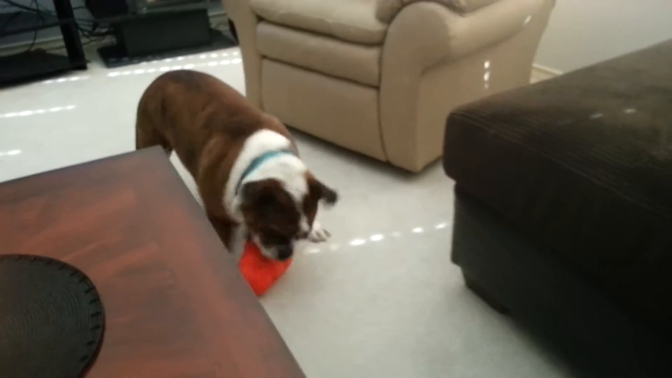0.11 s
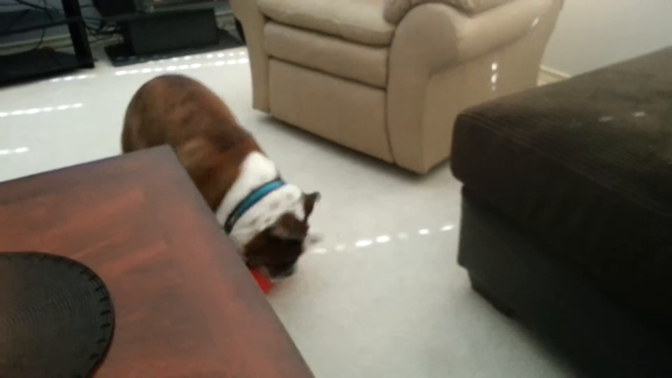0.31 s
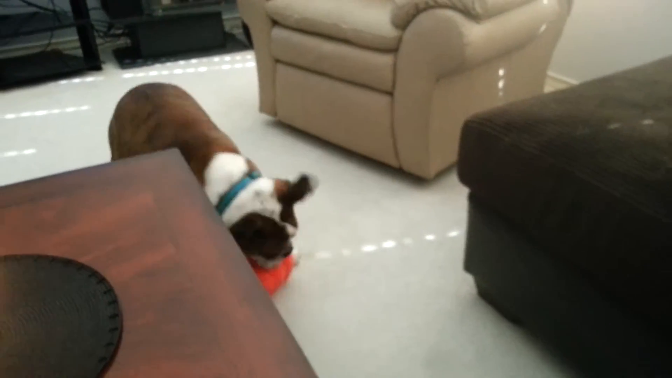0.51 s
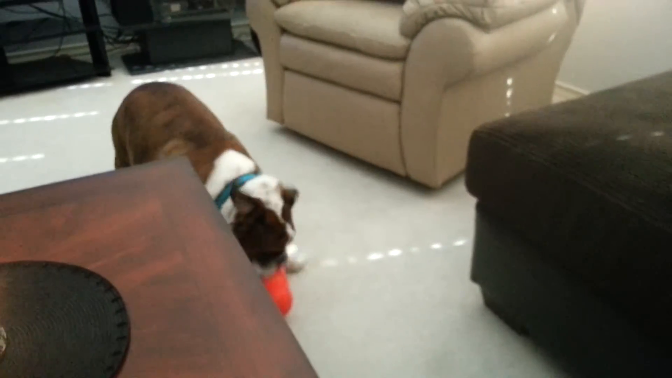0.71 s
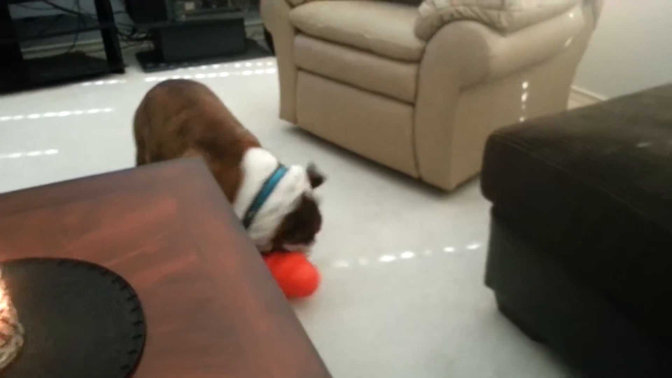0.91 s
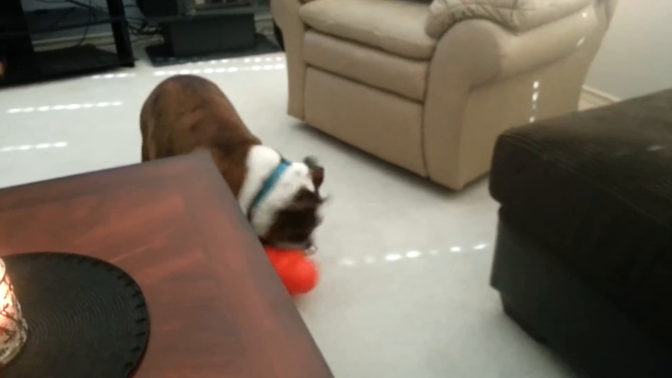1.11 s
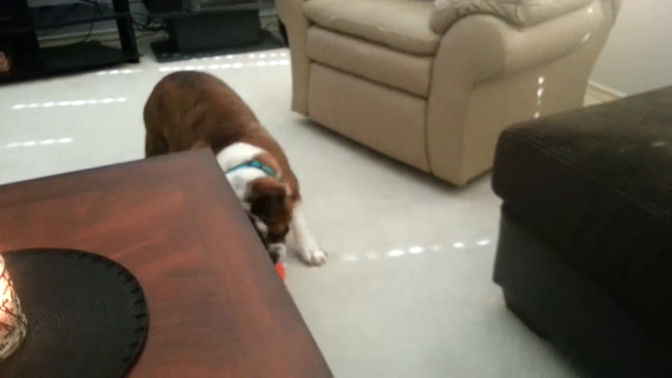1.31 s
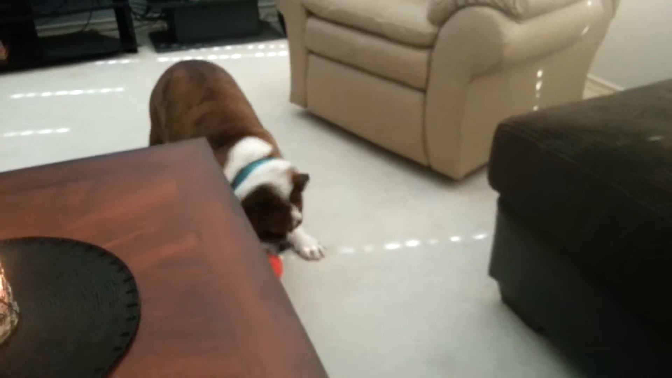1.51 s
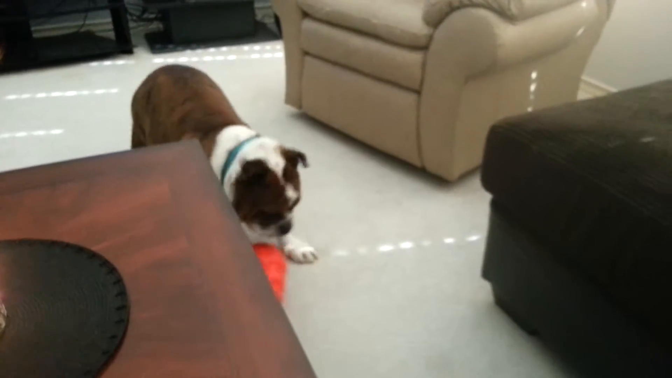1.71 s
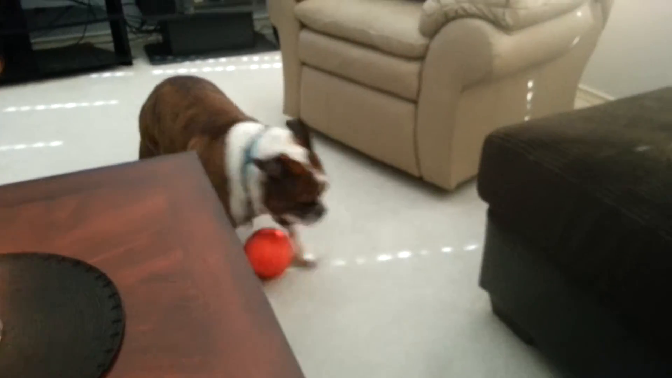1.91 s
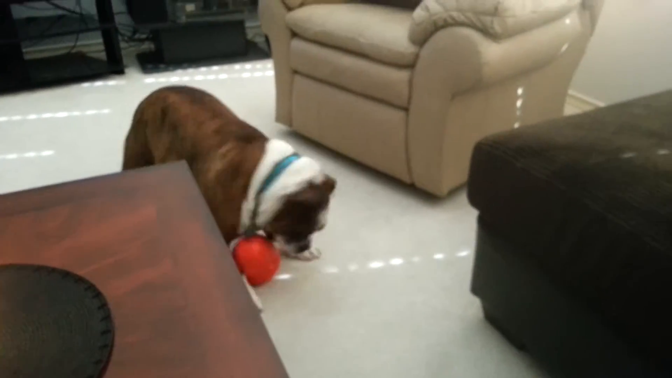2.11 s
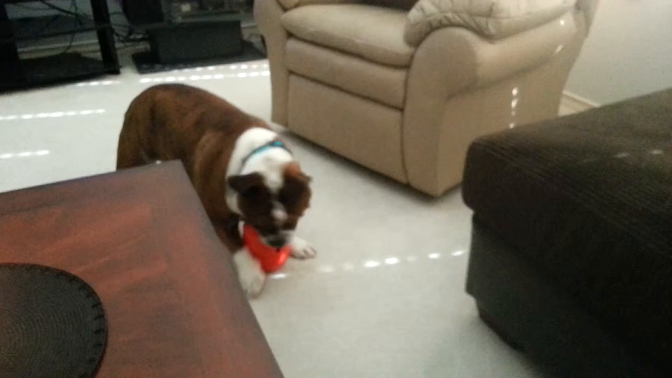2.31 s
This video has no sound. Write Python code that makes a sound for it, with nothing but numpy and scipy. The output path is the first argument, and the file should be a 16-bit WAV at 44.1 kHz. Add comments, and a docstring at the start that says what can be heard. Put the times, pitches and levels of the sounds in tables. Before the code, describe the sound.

Dog's raspy snorts and grunts, with ball knocks, mouth clicks and jingling collar tags indoors

```python
"""A short-nosed dog snorts three times while it noses and mouths a rubber ball on a living-room floor.
Snorts: uneven palate slaps chop noise, throat filters colour it, and a wavering tone grunts along.
Snuffles are filtered noise puffs; clicks and bumps are filtered snaps; scuffs are dense filtered ticks.
Collar tags and their ring are damped modes struck by snaps. A room with short reverb and a steady
room tone surrounds all this."""
import sys
import numpy as np
from scipy import signal
from scipy.fft import rfft, irfft
from scipy.io import wavfile
from scipy.ndimage import uniform_filter1d

SR = 44100
rng = np.random.default_rng(int(sys.argv[2]) if len(sys.argv) > 2 else 0)


def persist_wave(psi):
    """Save psi, clipped to +-1, as 16-bit WAV."""
    counts = np.round(np.clip(psi, -1, 1) * 32767).astype(np.int16)
    wavfile.write(sys.argv[1], SR, np.atleast_2d(counts).T)


N = 105840

# Snorts: start t/s, attack/s, hold/s, release/s, level/dB, median palate flutter f/Hz,
# slap level/dB, grunt f/Hz, grunt level re snort/dB
SNORTS = [(0.222, 0.091, 0.027, 0.078, -22.5, 98, -4.5, 641.7, -4),
          (1.005, 0.025, 0.12, 0.039, -31.5, 90.23, -12.5, 632.4, -4),
          (1.629, 0.08, 0.038, 0.15, -27.5, 82.04, -7, 700, -10)]
GRAINS_PER_S = 1800  # scuffs and tag shiver


def undb(db):
    """Level in dB to amplitude ratio."""
    return 10 ** (np.asarray(db) / 20)


def unit(x):
    """Scale to unit RMS."""
    return x / np.sqrt(np.mean(x ** 2) + 1e-18)


def times():
    """Sample times in s."""
    return np.arange(N) / SR


def freqs():
    """Bin frequencies in Hz of the zero-padded spectrum, at least 1."""
    return np.maximum(np.fft.rfftfreq(2 * N, 1 / SR), 1)


def curve(points):
    """(Hz, dB) points joined on a log-frequency axis."""
    hz, db = np.array(points).T
    return np.interp(np.log(freqs()), np.log(hz), db)


def hump(hz, octaves):
    """Broad resonance in dB: 4 dB down at the given octaves either side, floor at -70 dB."""
    return np.maximum(-4 * (np.log2(freqs() / hz) / octaves) ** 2, -70)


def resonances(modes):
    """Summed power response in dB of damped modes (Hz, width Hz, dB)."""
    power = 0
    for hz, width_hz, db in modes:
        detune = (freqs() / hz - hz / freqs()) * hz / width_hz
        power = power + undb(db) ** 2 / (1 + detune ** 2)
    return 10 * np.log10(power)


def colour(x, db):
    """Minimum-phase filter of unit power gain with the given dB response."""
    cepstrum = irfft(np.log(unit(undb(db))))
    cepstrum[1:N] *= 2  # fold to make it causal
    cepstrum[N + 1:] = 0
    response = np.exp(rfft(cepstrum))
    return irfft(rfft(x, 2 * N) * response)[:N]


def fade(t60_s, start_s=0):
    """Exponential decay, 60 dB per t60_s, from a start time."""
    t = times() - start_s
    return (t >= 0) * np.exp(-np.log(1000) * np.clip(t / t60_s, 0, 10))


def swell(start_s, attack_s, hold_s, release_s):
    """Attack, hold, release, with slightly concave ramps."""
    corners_s = start_s + np.cumsum([0, attack_s, hold_s, release_s])
    return np.interp(times(), corners_s, [0, 1, 1, 0]) ** 1.11


def burst(start_s, length_s, attack, hold):
    """Swell whose attack and hold are shares of its length."""
    release = max(1 - attack - hold, 0)
    return swell(start_s, length_s * attack, length_s * hold, length_s * release)


def noise():
    """White noise of unit RMS."""
    return rng.standard_normal(N)


def grains(per_s):
    """Tiny ticks at random moments and of random size, unit RMS."""
    return unit((rng.random(N) < per_s / SR) * noise())


def snap(start_s, t60_s, rattle):
    """Blow of unit energy: one impulse and a dying noise chatter."""
    impulse = 1. * (np.arange(N) == int(start_s * SR))
    return unit(impulse + rattle * noise() * fade(t60_s, start_s)) / np.sqrt(N)


def diffuse():
    """Stereo noise, alike in the bass and unrelated in the treble."""
    spread_hz = 560
    alike = 1 / (1 + (freqs() / spread_hz) ** 2)
    mid = irfft(rfft(noise(), 2 * N) * np.sqrt((1 + alike) / 2))[:N]
    side = irfft(rfft(noise(), 2 * N) * np.sqrt((1 - alike) / 2))[:N]
    return np.array([mid + side, mid - side])


def snuffles():
    """Quiet turbulent air through the nose, each puff with its own nostril resonance."""
    # start t/s, length/s, level/dB, nostril f/Hz
    puffs = [(-.04, 0.17, -42, 827), (0.046, 0.1, -44.5, 1320), (0.203, 0.13, -31, 1294),
             (0.491, 0.25, -40.5, 2255), (0.698, 0.16, -42, 2065), (0.999, 0.033, -42, 1800),
             (1.271, 0.089, -43, 923), (2.122, 0.35, -48, 2340)]
    # nose spectrum: f/Hz, level/dB per Hz
    nose = [(100, -9.5), (227, 0.5), (449, -8), (962, 1.5), (2200, -3.5), (4870, -8.5), (12000, -26)]
    nostril_db, nostril_octaves = -5.5, 0.094
    air = colour(noise(), curve(nose))
    out = 0
    for start_s, length_s, db, hz in puffs:
        whistle = undb(nostril_db) * colour(noise(), hump(hz, nostril_octaves))
        puff = burst(start_s, length_s, attack=0.27, hold=0.18)
        out = out + undb(db) * puff * (air + whistle)
    return out


def room_tone():
    """Steady diffuse noise with the room's spectrum."""
    # room tone spectrum: f/Hz, level/dB per Hz
    air = [(30, -14), (70, -7), (120, -12), (240, -1.5), (450, -10), (900, -8), (1600, -17), (4900, -19),
           (6000, -22.5), (14000, -29)]
    return undb(-49.5) * np.array([colour(channel, curve(air)) for channel in diffuse()])


def tags():
    """A tick and a chatter ring two tags and their ring; large tag and ring also shiver throughout."""
    # clinks: t/s, large tag level/dB, small tag level/dB, ring level/dB
    clinks = [(.112, -7, -5.5, -14), (.426, -3.5, -22, -9.5), (0.593, -14, -15, -13), (.912, -11, -19, -14),
              (.938, -7, -32, -14.5), (1.168, -12, -30, -9), (1.36, -10.5, -3.5, -4.5),
              (1.3735, -10, -11, -17), (1.385, -16, -20, -4.5), (2.031, 3.5, -24, -13.5),
              (2.086, -5, -43, -18), (2.21, -8.5, -28, -27), (2.275, -7.5, -50, -23)]
    # modes of large tag, small tag, ring: f/Hz, width/Hz, level/dB
    metal = [
        [(4710, 110, 0), (4930, 280, -4), (7700, 400, -13)],
        [(6450, 50, 0), (6130, 50, -9), (7300, 1800, -21)],
        [(11750, 70, 0)],
    ]
    chatter_t60_s, chatter, shiver_db = 0.073, 0.098, -56.5
    blows = np.array([snap(row[0], chatter_t60_s, chatter) for row in clinks])
    large, _, ring = metal
    out = undb(shiver_db) * colour(grains(GRAINS_PER_S), resonances(large + ring))
    for levels_db, modes in zip(np.array(clinks).T[1:], metal):
        out = out + colour(undb(levels_db) @ blows, resonances(modes))
    return out


def bumps():
    """Dull blows of paws and ball on the floor; the hollow ball adds a faint knock to each."""
    # t/s, level/dB, centre f/Hz
    blows = [(.006, -18.5, 101), (.232, -7, 200), (.456, -4.5, 253), (0.55, -8.5, 160), (.755, -15.5, 180),
             (.793, -9.5, 162), (0.922, -18, 131), (1.175, -8, 298), (1.397, -10.5, 310),
             (1.397, -13.5, 84), (2.02, -9, 201), (2.061, -12, 95), (2.275, -11.5, 290)]
    octaves, knock_hz, knock_db = .8, 594, -15.5
    knock = knock_db + hump(knock_hz, octaves)
    out = 0
    for start_s, db, hz in blows:
        response_db = np.maximum(hump(hz, octaves), knock)
        out = out + undb(db) * colour(snap(start_s, t60_s=.065, rattle=.07), response_db)
    return out


def clicks():
    """Teeth and wet lips snap off the ball, each snap trailing a little crackle."""
    # t/s, level/dB, centre f/Hz, width/octaves, crackle T60/s
    snaps = [(0.0779, -4, 1800, 0.82, 0.025), (0.2868, 3.5, 3520, 0.35, 0.019),
             (0.32, -1, 1710, 1.01, 0.011), (0.3291, 5, 2200, 0.79, 0.014),
             (0.3614, -5.5, 3400, 0.77, 0.0055), (.451, 3.5, 3510, 0.37, 0.0047),
             (0.463, -4, 3640, 0.78, 0.012), (0.9381, -13.5, 4870, 1.1, 0.018),
             (1.183, -10, 4200, 0.66, 0.01), (1.8179, 4.5, 3650, 0.4, 0.012), (1.8325, 2, 3780, 0.21, 0.06),
             (1.9951, -1, 1140, 0.95, 0.006), (2.0073, 3.5, 2000, 1.24, 0.016),
             (2.0246, 3.5, 6000, 2.4, 0.0073), (2.0278, 1.5, 1830, 1.2, 0.003),
             (2.088, -14, 6950, 2.5, 0.026), (2.2703, -12.5, 5050, 2.8, 0.0056)]
    out = 0
    for start_s, db, hz, octaves, crackle_t60_s in snaps:
        out = out + undb(db) * colour(snap(start_s, crackle_t60_s, rattle=0.39), hump(hz, octaves))
    return out


def scuffs():
    """Dense tiny slips as paws and rubber drag."""
    # start t/s, length/s, level/dB
    drags = [(0.089, 0.058, -38.5), (0.373, 0.13, -38), (0.523, 0.17, -45), (0.921, 0.075, -47.5),
             (1.163, 0.04, -35.5), (1.36, 0.087, -41.5), (1.801, 0.11, -42), (2.003, 0.052, -32.5),
             (2.072, 0.061, -40.5), (2.172, 0.055, -44.5)]
    # scuff spectrum: f/Hz, level/dB per Hz
    friction = [(300, -2), (1500, -1.5), (3000, 5), (4800, 1.5), (6500, 3.5), (8000, 2.5), (10000, 3.5),
                (14000, -24)]
    drag = 0
    for start_s, length_s, db in drags:
        drag = drag + undb(db) * burst(start_s, length_s, attack=0.11, hold=0.82)
    return colour(grains(GRAINS_PER_S) * drag, curve(friction))


def snorts():
    """The palate slaps unevenly and chops the air, spit crackles; throat and nose colour it all."""
    # throat and nose spectrum of each snort: f/Hz, level/dB per Hz
    throats = [
        [(60, -26), (309, -8.5), (377, -7), (482, -17.5), (628, -6), (687, -19.5), (930, -5), (1170, -21.5),
         (1700, -17), (4320, -13.5), (5640, -23.5), (12500, -37.5), (14000, -72)],
        [(60, -19.5), (235, -12), (286, 0.5), (380, -25), (482, -28), (628, -3.5), (780, -14), (900, -7.5),
         (1150, -19.5), (2400, -21), (4500, -14), (5800, -24.5), (12000, -33), (14000, -81)],
        [(60, -34), (190, -4), (353, -3.5), (471, -14), (687, -7), (1140, -2), (1550, -15), (4830, -12.5),
         (5770, -18.5), (12000, -25.5), (14000, -47)],
    ]
    jitter, scatter_db = .22, 3.5  # of slap interval (log) and slap level
    puff_s, leak, air_db = 0.0019, 0.84, 0.88
    spit_per_s, spit_db = 450, -5
    out = 0
    for row, throat in zip(SNORTS, throats):
        start_s, attack_s, hold_s, release_s, db, flutter_hz, slap_db, _, _ = row
        chance = rng.standard_normal(size=(400, 2))
        intervals_s = np.exp(jitter * chance[:, 0]) / flutter_hz
        at = (np.cumsum(intervals_s) * SR).astype(int)
        sizes = undb(scatter_db * np.clip(chance[at < N, 1], -2, 1))
        slaps = np.bincount(at[at < N], sizes, N)
        puffs = signal.lfilter([1], [1, -np.exp(-1 / (puff_s * SR))], slaps)
        air = (unit(puffs) + leak) * noise()
        effort = swell(start_s, attack_s, hold_s, release_s)
        smacks = effort * (unit(slaps) + undb(spit_db) * grains(spit_per_s))  # effort acts twice on these
        rasp = colour(undb(slap_db) * smacks + undb(air_db) * unit(air), curve(throat))
        out = out + undb(db) * effort * rasp
    return out


def grunts():
    """A narrow, wavering tone catches partway through each snort's attack and lasts through its hold."""
    lag, release_s = .55, 0.041  # lag as share of the attack
    drift_width_hz = 20  # line width from random phase drift
    out = 0
    for start_s, attack_s, hold_s, _, db, _, _, hz, grunt_db in SNORTS:
        steps = uniform_filter1d(noise(), size=60)
        drift = np.cumsum(steps) * np.sqrt(2 * np.pi * drift_width_hz / SR)
        tremble = 1 + .5 * unit(uniform_filter1d(noise(), size=300))
        tone = unit(tremble * np.sin(2 * np.pi * hz * times() + drift))
        push = swell(start_s + lag * attack_s, (1 - lag) * attack_s, hold_s, release_s)
        out = out + undb(db + grunt_db) * push * tone
    return out


def room(x, wet_db):
    """Direct sound, quick reflections and a short tail that dies first at the top; power-normalized."""
    gap_s, right_lead_s = 0.0038, .00005  # source slightly to the right

    def norm(h):
        return h / np.sqrt(np.sum(h ** 2) / 2)

    def below(hz):
        return signal.sosfiltfilt(signal.butter(3, hz, fs=SR, output="sos"), wash)

    wash = diffuse()
    low, body = below(2000), below(9000)
    tail = low * fade(0.39, gap_s)
    tail = tail + (body - low) * fade(0.4, gap_s)
    tail = tail + (wash - body) * fade(0.17, gap_s)
    early = diffuse() * fade(.09, gap_s)
    h = undb(wet_db) * (norm(tail) + norm(early))
    direct = np.array([np.interp(times() - right_lead_s, times(), x), x])
    wet = signal.fftconvolve(h, x[None], axes=1)[:, :N]
    return (direct + wet) / np.sqrt(np.sum(h ** 2) / 2 + 1)


def scene():
    """Every source in the room, each with its own reverb level, plus room tone."""
    out = room(snorts() + snuffles(), wet_db=-1) + room_tone()
    out = out + room(tags(), wet_db=11)
    out = out + room(bumps(), wet_db=-3)
    out = out + room(clicks(), wet_db=-4)
    out = out + room(scuffs(), wet_db=-3)
    return out + room(grunts(), wet_db=-9)


def record(dry):
    """Two microphones of differing colour, then a high-pass at 62 Hz and a steep low-pass at 14.5 kHz."""
    # microphone balance: f/Hz, left minus right level/dB
    balance = [(700, 0), (1300, -1), (2400, 1.5), (4400, 5), (8100, -5), (12000, 5.5)]
    tilt_db = curve(balance) / 2
    x = irfft(rfft(dry, 2 * N) * undb([tilt_db, -tilt_db]))[:, :N]
    x = signal.sosfilt(signal.butter(4, 62, "high", fs=SR, output="sos"), x)
    return signal.sosfilt(signal.ellip(8, .2, 80, 14500, fs=SR, output="sos"), x)


dry = scene()
out = record(dry)
persist_wave(out)
```